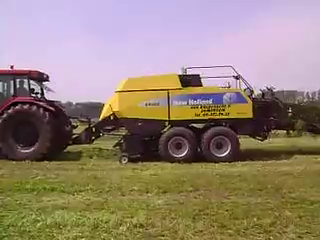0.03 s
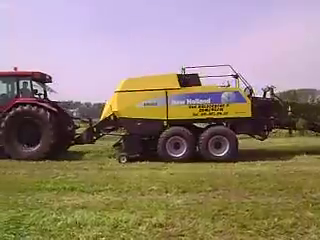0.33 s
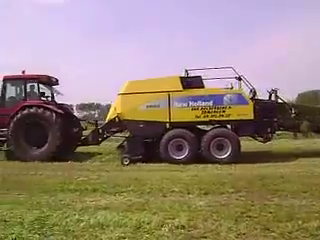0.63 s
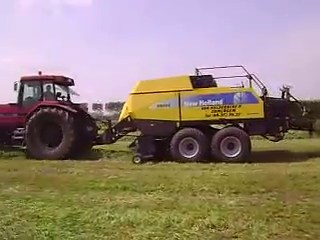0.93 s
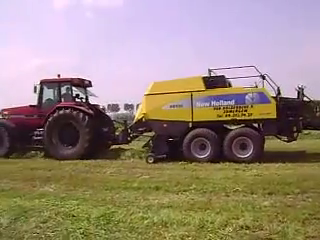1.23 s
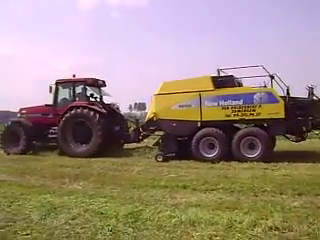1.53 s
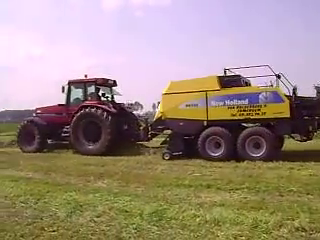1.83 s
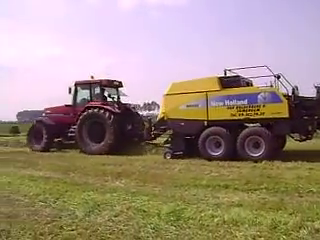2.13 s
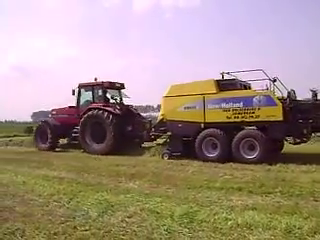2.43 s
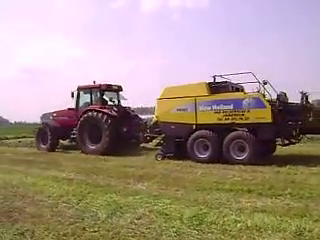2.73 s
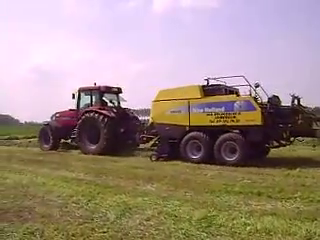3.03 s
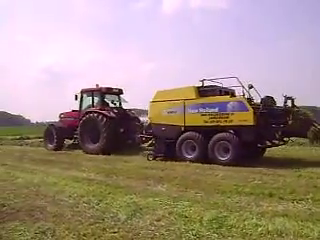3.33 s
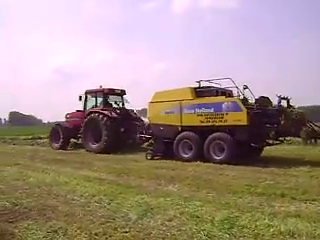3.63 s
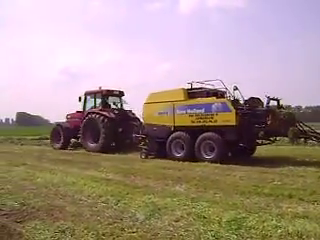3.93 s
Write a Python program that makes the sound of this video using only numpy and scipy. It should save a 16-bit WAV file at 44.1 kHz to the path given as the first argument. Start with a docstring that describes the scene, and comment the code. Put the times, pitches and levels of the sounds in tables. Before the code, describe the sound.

A diesel tractor drones while its hay baler clatters, thumps and clanks.

```python
"""Tractor and square baler

A diesel tractor draws slowly away over a mown field, towing a baler. Periodic firing makes the
exhaust drone and the block rattle over a low roar. The pickup's tines tick through the hay, the
drive clatters and its chains ring. About every 0.7 s a plunger blow or a dull thud excites the
baler's steel resonances. A small camera picks it up in a narrow band and overloads on the blows."""
import sys
import numpy as np
from scipy import signal
from scipy.fft import rfft, irfft
from scipy.io import wavfile

SR = 44100
rng = np.random.default_rng(int(sys.argv[2]) if len(sys.argv) > 2 else 0)


def transcribe(u):
    """Save the signal u as a 16-bit wav file named by the first command-line argument.

    u: samples, shape (n,) or (channels, n), limited to [-1, 1]; the rate is SR.
    q: integer samples, one column per channel.
    """
    v = np.clip(np.atleast_2d(u).T, -1, 1)
    q = np.round(v * 32767).astype(np.int16)
    wavfile.write(sys.argv[1], SR, q)


N = 176400
T, HZ = np.arange(N) / SR, np.fft.rfftfreq(N, 1 / SR)


def amp(db):
    """Amplitude ratio of a level in decibels."""
    return 10 ** (np.asarray(db) / 20)

def unit(x):
    """Normalisation to rms 1."""
    return x / np.sqrt(np.mean(x ** 2) + 1e-20)

def curve(points):
    """Linear interpolation of (time [s], value) points."""
    return np.interp(T, *np.transpose(points))

def colour(x, spectrum, tilt_db=0):
    """Spectral shaping, with a tilt per octave; the result has rms 1."""
    hz, db = np.transpose(spectrum)
    octave = np.log2(HZ + 1)
    gain = amp(np.interp(octave, np.log2(hz + 1), db) + tilt_db * octave)
    return unit(irfft(rfft(x) * gain, N))

def drift(rate_hz):
    """Low-pass noise: a random wander of rms 1."""
    return unit(irfft(rfft(rng.standard_normal(N)) * np.exp(-(HZ / rate_hz) ** 2), N))

def envelope(start, rise, hold, decay):
    """Linear attack, hold and exponential decay, all in seconds."""
    attack = np.clip((T - start) / rise, 0, 1)
    return attack * np.exp(-np.maximum(T - start - rise - hold, 0) / decay)

def tone(hz, wander_hz, rate_hz):
    """Random frequency modulation broadens a partial of rms 1."""
    cycles = np.cumsum(hz + wander_hz * drift(rate_hz)) / SR
    return unit(np.cos(2 * np.pi * (cycles + rng.random())))


# engine speed (time [s], four-stroke cycle rate [Hz])
CYCLE_RATE = [(0, 18.25), (.4, 18.27), (.62, 18.09), (1, 18.25), (1.6, 18.27), (2.05, 18.07), (2.9, 18.27),
              (3.5, 18.17), (4, 18.22)]

def engine_cycles():
    """Phase, in cycles, is the integral of a speed that sags under the plunger's load."""
    return np.cumsum(curve(CYCLE_RATE)) / SR

# exhaust spectrum (multiple of the cycle rate, relative level [dB])
EXHAUST_HARMONICS = [(6, -4.5), (7, -8.5), (8, -6), (9, -7.5), (10, 0), (11, -2.5), (12, 1), (14, -3.5),
                     (17, -3.5), (18, -14), (20, -3.5), (21, -6.5), (22, -8), (24, -6.5)]
# exhaust as the tractor draws away (time [s], gain [dB])
EXHAUST_GAIN = [(0, 2.5), (.6, 2.5), (1.1, 1), (1.6, -0.5), (2.1, -2.5), (2.6, -3), (3.05, -4.5),
                (3.2, -15), (3.6, -8), (4, -5.5)]

def exhaust(cycles, level_db=-22.5, waver=.27, jitter_rad=.32):
    """Periodic gas pulses give a harmonic series; each partial wavers in amplitude and phase."""
    drone = np.zeros(N)
    for order, db in EXHAUST_HARMONICS:
        strength = amp(db) * (1 + waver * drift(5.1))
        phase = 2 * np.pi * (order * cycles + rng.random()) + jitter_rad * drift(4.3)
        drone += strength * np.cos(phase)
    return amp(level_db + curve(EXHAUST_GAIN)) * unit(drone)

# deep engine boom (time [s], level [dB])
BOOM_LEVEL = [(0, -22.5), (.35, -32), (.55, -49), (.7, -25), (1.4, -27), (1.77, -27.5), (1.9, -44),
              (2.1, -31), (3.2, -33), (4, -32)]

def boom(cycles, order=5):
    """One low harmonic of the engine cycle swells and fades."""
    return amp(curve(BOOM_LEVEL) + .64 * drift(10)) * unit(np.cos(2 * np.pi * order * cycles))

# resonances of the block and covers (frequency [Hz], relative level [dB])
BLOCK_SPECTRUM = [(60, -41.5), (450, -17), (540, -2.5), (640, -5), (740, 0.5), (1020, -1), (1160, 3),
                  (1280, -23), (1650, -20.5), (2400, -15), (5500, -16)]
# knock and rattle together (time [s], gain [dB])
BLOCK_GAIN = [(0, 3.5), (.6, 2.5), (1.1, .5), (1.6, -2), (2.1, -0.5), (2.6, -6), (3.05, -1), (3.2, -7),
              (3.6, -2), (4, -8.5)]

def engine_block(cycles, cylinders=6, knock_db=-23, rattle_db=-21.5, knock_from_hz=620):
    """Forced vibration: firing drives the block with a knock pattern each cycle and a random rattle."""
    firing = np.exp(-(cycles * cylinders % 1) / 1.8)  # decay constant in firing intervals
    pattern = irfft(np.exp(2j * np.pi * rng.random(size=601)))  # flat spectrum, random phases
    knocks = firing * np.interp(cycles % 1, np.linspace(0, 1, len(pattern)), pattern)
    highpass = signal.butter(4, knock_from_hz, "high", fs=SR, output="sos")
    knock = colour(signal.sosfilt(highpass, knocks), BLOCK_SPECTRUM)
    rattle = colour(firing * rng.standard_normal(N), BLOCK_SPECTRUM)
    return amp(curve(BLOCK_GAIN)) * (amp(knock_db) * knock + amp(rattle_db) * rattle)

# driveline and tyre noise (frequency [Hz], relative level [dB])
ROAR_SPECTRUM = [(20, -17), (60, -10), (100, -2.5), (140, -4.5), (205, 1.5), (260, -6), (400, 0),
                 (520, -16.5), (900, 3.5), (3000, -40)]
# swell of that noise (time [s], gain [dB])
ROAR_GAIN = [(0, -3), (.6, 2.5), (1.1, .5), (1.6, 1.5), (2.1, -1), (2.6, -2.5), (3.05, -2), (3.2, -1),
             (3.6, -0.5), (4, -2)]

def driveline_and_tyres(level_db=-19):
    """Aperiodic vibration has a continuous spectrum, heard as a low roar."""
    roar = colour(rng.standard_normal(N), ROAR_SPECTRUM)
    return roar * amp(level_db + curve(ROAR_GAIN) + .5 * drift(5.8))

# drive and sheet metal (frequency [Hz], relative level [dB])
CLATTER_SPECTRUM = [(100, -14), (310, -1.5), (520, -12.5), (700, -0.5), (880, -5), (1150, -2), (1330, -3),
                    (1680, -3.5), (1860, -13.5), (2120, -6.5), (2550, -17), (3300, -11.5), (3900, -21),
                    (5000, -17.5), (6000, -17)]
# ticks of the pickup tines (frequency [Hz], relative level [dB])
TINE_SPECTRUM = [(300, -25.5), (1000, -11.5), (1600, 5), (2500, -3.5), (3200, 2.5), (3900, -1), (5000, 1),
                 (6000, -1.5)]
# clatter and tines together (time [s], gain [dB])
BALER_GAIN = [(0, 2), (.7, -1), (1.25, 2.5), (1.7, 2), (2.1, 1), (2.5, 4), (2.85, 0.5), (3.05, 2.5),
              (3.2, 0), (3.4, 2.5), (3.55, -1.5), (4, 2)]

def drive_and_pickup(clatter_db=-20.5, tines_db=-26, ticks_per_s=2200, rotor_hz=7.8):
    """Amplitude modulation: the clatter flutters, and the feed rotor pulses the tines' shot noise."""
    clatter = amp(clatter_db + 1.43 * drift(39)) * colour(rng.standard_normal(N), CLATTER_SPECTRUM)
    ticks = (rng.random(N) < ticks_per_s / SR) * rng.choice([-1, 1], N)
    ticks = ticks * amp(4.5 * np.minimum(rng.exponential(1, N), 4))  # a few stand out
    rotor = 1 + .22 * np.cos(2 * np.pi * rotor_hz * (T - .055))
    tines = amp(tines_db + 1.5 * drift(76)) * rotor * colour(ticks, TINE_SPECTRUM)
    return amp(curve(BALER_GAIN)) * (clatter + tines)

# resonances of the bale chamber (frequency [Hz], relative level [dB])
CHAMBER_SPECTRUM = [(40, -29.5), (150, -19.5), (300, -4), (520, -10), (700, -3), (980, -3), (1350, -7.5),
                    (1800, -11.5), (2100, -9.5), (2600, -15.5), (4000, -18), (6000, -18.5)]
# modes of the steel panels (frequency [Hz], relative level [dB])
PANEL_MODES = [(296, -3.5), (620, -1), (826, 1.5), (880, -14), (1045, 3.5), (1464, -7.5), (2050, -11.5),
               (2277, -14.5)]
# plunger blows, the first struck in two quick parts (time [s], level [dB], hold [s], decay [s], noise tilt
# [dB/octave],
PLUNGER_BLOWS = [(0.38, -15.5, 0.014, 0.014, 1, -1, -2), (0.413, -15.5, 0.017, 0.033, 0.8, -4, -2),
                 (0.959, -16, 0.018, 0.015, 0, -17, 0), (1.035, -12, 0.032, 0.033, 0, -2.5, -2),
                 (1.824, -13, 0.037, 0.034, -0.5, 0.5, 4), (3.27, -9, 0.012, 0.059, 1.2, -3.5, -2),
                 (3.357, -19.5, .03, 0.012, -.5, -1, 4.5), (3.952, -11.5, 0.015, 0.018, 0.5, -9.5, -16)]

def plunger(crack_db=2.5):
    """Impact excitation: each blow cracks, and the chamber and its panels ring in a damped crash."""
    out = np.zeros(N)
    modes = [(np.log2(hz), db, tone(hz, wander_hz=13.97, rate_hz=36.2)) for hz, db in PANEL_MODES]
    for start, db, hold, decay, tilt, ring_db, ring_tilt in PLUNGER_BLOWS:
        crash = colour(rng.standard_normal(N), CHAMBER_SPECTRUM, tilt)
        ring = unit(sum(amp(level + ring_tilt * octave) * mode for octave, level, mode in modes))
        body = envelope(start, .005, hold, decay) * (crash + amp(ring_db) * ring)
        bright_noise = colour(rng.standard_normal(N), CHAMBER_SPECTRUM, tilt + 4.5)
        crack = envelope(start, .001, .0018, .0057) * bright_noise
        out += amp(db) * (body + amp(crack_db) * crack)
    return out

# strikes of loose parts (time [s], level [dB])
CLANK_STRIKES = [(1.346, -21), (1.531, -11), (2.515, -12), (2.64, -26), (3.164, -10), (3.633, -9.5)]

def loose_parts(decay_s=.0076):
    """Brief contacts excite a wide band: sharp clanks coloured by the chamber's resonances."""
    clank = colour(rng.standard_normal(N), CHAMBER_SPECTRUM, tilt_db=2)
    return clank * sum(amp(db) * envelope(start, .00055, .002, decay_s) for start, db in CLANK_STRIKES)

# dull thuds of the frame (time [s], level [dB])
FRAME_THUDS = [(.96, -18.5), (1.05, -22), (2.21, -26.5), (2.71, -24.5), (2.99, -19), (3.29, -21)]

def frame(mode_hz=229, rise_s=.027):
    """A damped low resonance of the frame swells and dies away in each thud."""
    out = np.zeros(N)
    for start, db in FRAME_THUDS:
        age = np.maximum(T - start, 0) / rise_s
        out += amp(db) * age * np.exp(1 - age) * tone(mode_hz, wander_hz=40, rate_hz=50)
    return out

# modes of the drive chains (frequency [Hz], rms wander [Hz], level [dB])
CHAIN_MODES = [(2836, 39.7, -38), (3071, 48, -34.5)]
# swell of their ring (time [s], gain [dB])
CHAIN_GAIN = [(0, 5), (.2, 3.5), (.7, 1.5), (1.1, 3), (2, 1), (2.25, -1.5), (2.55, 1), (3.1, -2), (3.6, -5),
              (4, -2)]

def chains():
    """Narrow-band resonance: two high partials flicker in level and pitch."""
    ring = sum(amp(db + 2 * drift(90)) * tone(hz, wander, rate_hz=120) for hz, wander, db in CHAIN_MODES)
    return amp(curve(CHAIN_GAIN)) * ring


def scene():
    """Superposition of tractor and baler in the open air, in one channel."""
    cycles = engine_cycles()
    tractor = exhaust(cycles) + boom(cycles) + engine_block(cycles) + driveline_and_tyres()
    baler = drive_and_pickup() + chains() + plunger() + frame() + loose_parts()
    return (tractor + baler)[None]

def record(dry, edge_hz=5425, edge_width_hz=236, ceiling=.715, knee=60):
    """Band limiting and saturation: the camera cuts the treble, clips peaks and filters the result."""
    passband = 1 / (1 + np.exp(np.clip((HZ - edge_hz) / edge_width_hz, -20, 20)))
    steep_cut = 1 / (1 + (HZ / 6072) ** 120)
    narrow = irfft(rfft(dry) * passband * steep_cut, N)
    clipped = narrow / (1 + abs(narrow / ceiling) ** knee) ** (1 / knee)
    lowpass = signal.firwin(511, 15800, window=("kaiser", 9), fs=SR)
    return signal.oaconvolve(clipped, lowpass[None], "same")


dry = scene()
out = record(dry)
transcribe(out)
```